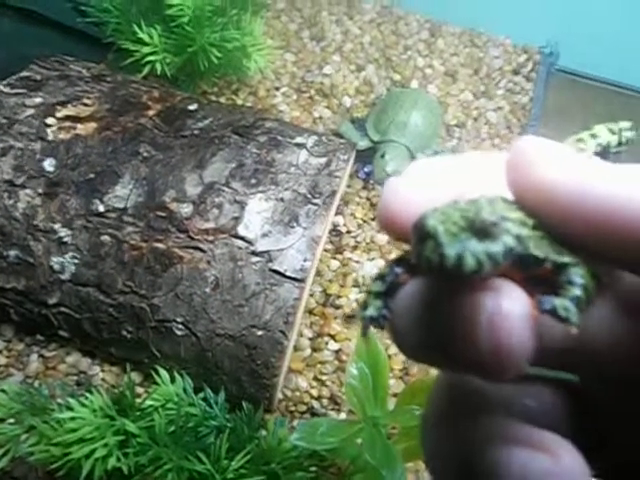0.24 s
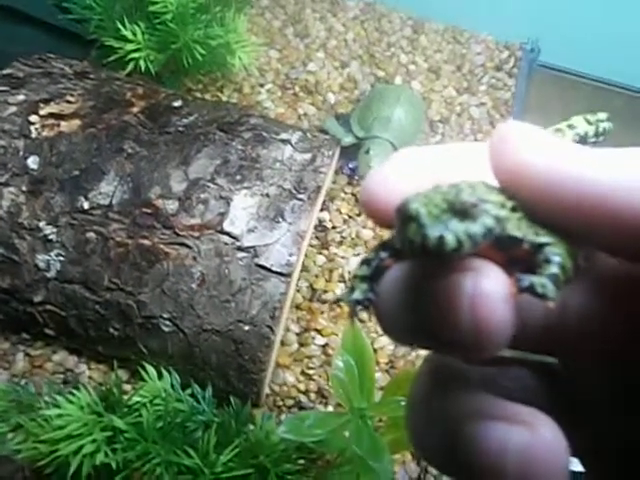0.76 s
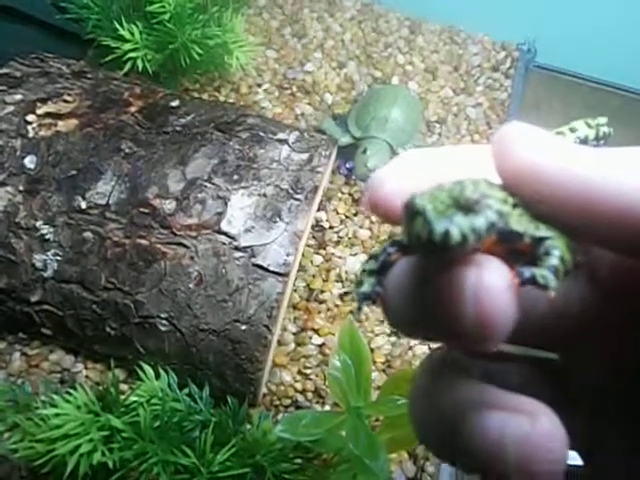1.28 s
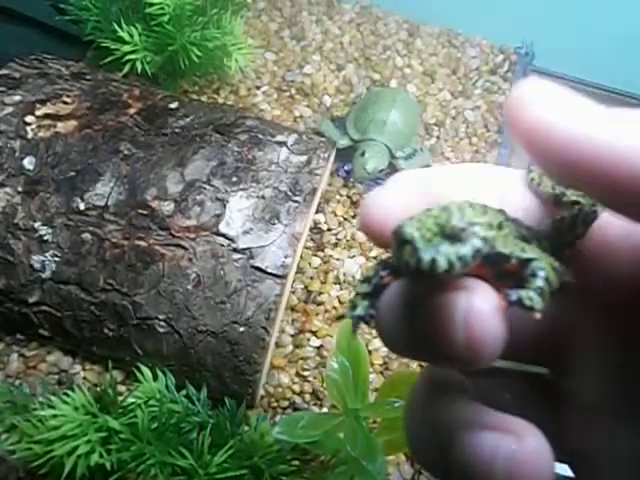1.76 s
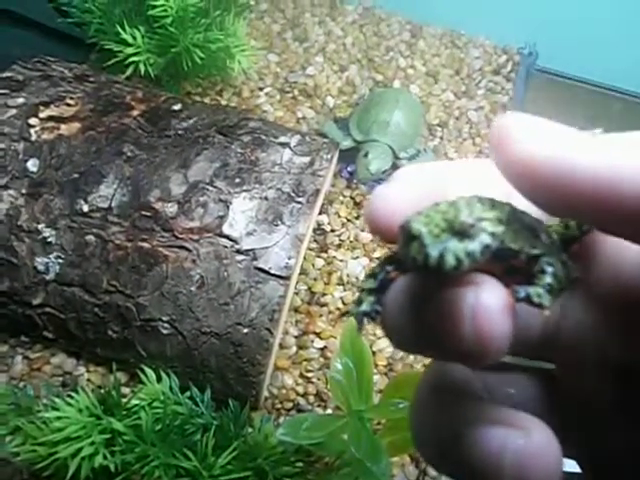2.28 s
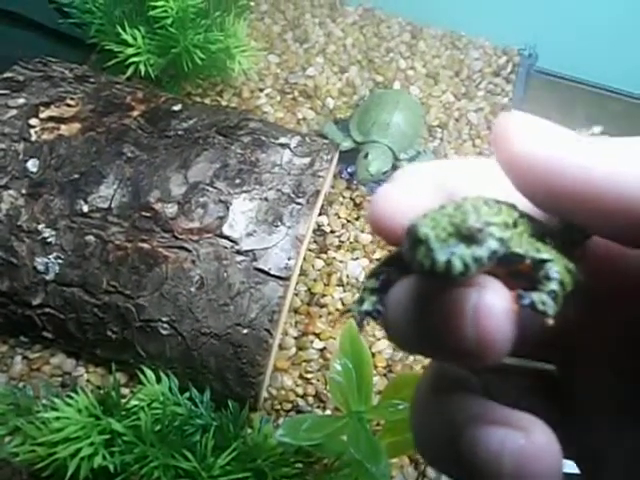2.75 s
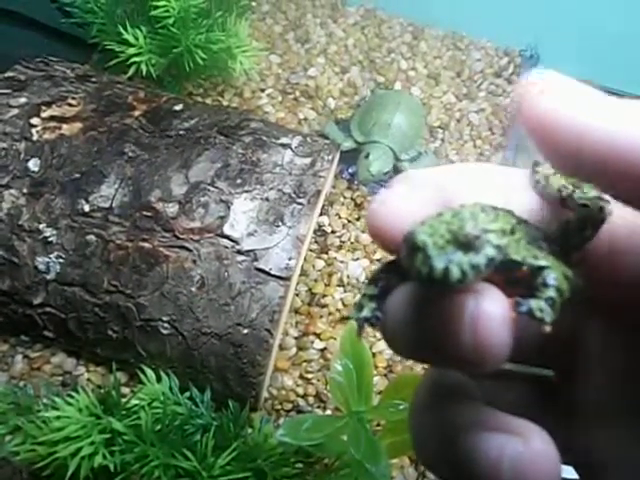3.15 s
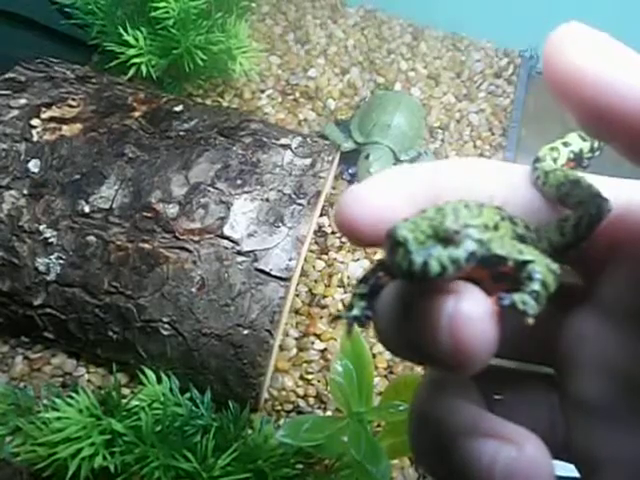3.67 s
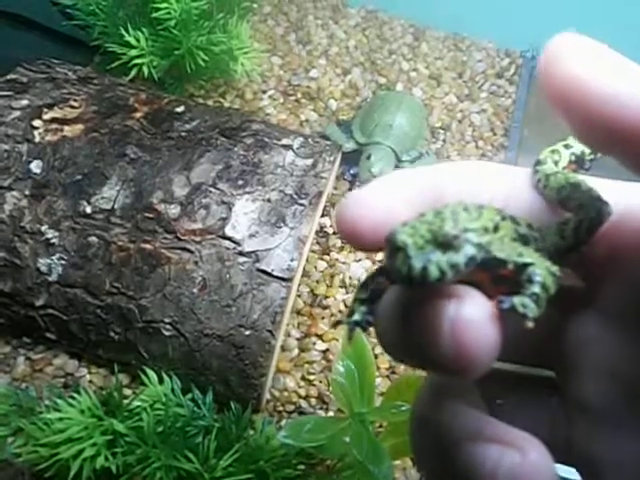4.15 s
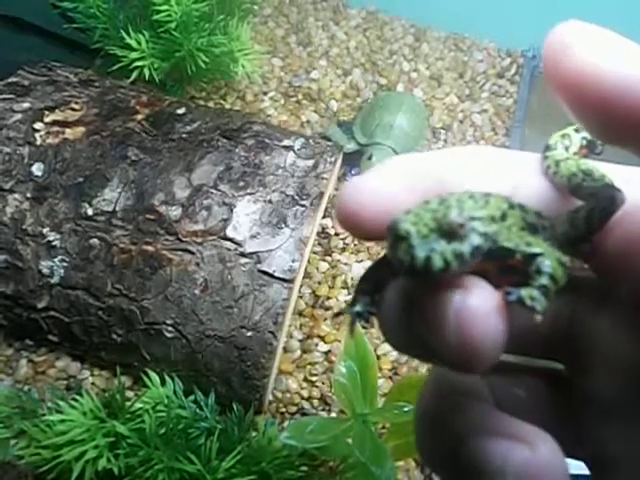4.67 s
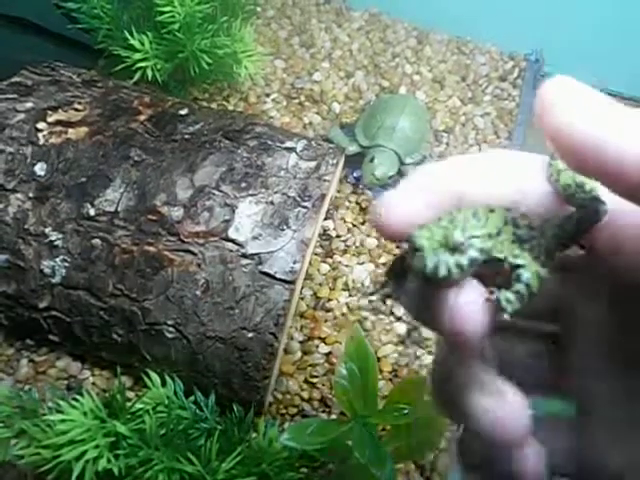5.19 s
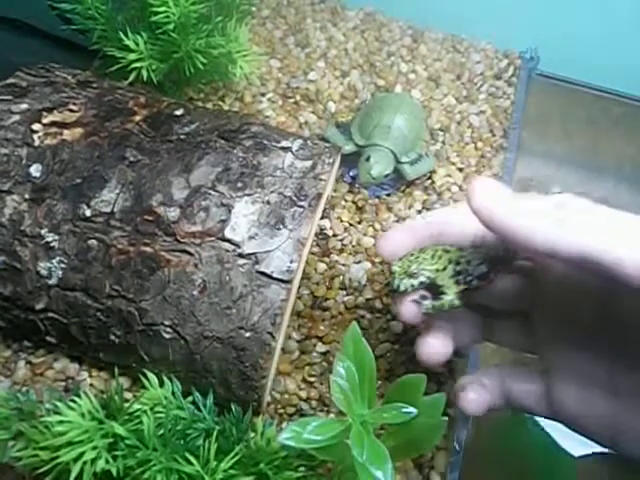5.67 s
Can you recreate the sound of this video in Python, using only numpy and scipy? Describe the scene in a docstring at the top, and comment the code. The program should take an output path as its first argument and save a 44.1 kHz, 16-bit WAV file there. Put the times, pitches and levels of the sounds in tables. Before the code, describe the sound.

A steady low hum near 120 Hz, with a soft rumble, runs throughout from a tank pump, under a quiet, slightly throbbing rush of water with fine crackle and irregular small ticks. Faint finger scuffs and a brief soft low tone come in the first 0.7 seconds. From about 0.35 to 1.1 seconds a small toad close by gives ten rapid chirps, each a tiny round whistle of some 30 milliseconds around 1.1 kHz, rising quickly then sagging, with a short hollow ring. Hum, water and ticks alone follow, with a barely audible wavering low tone near 2.1 to 2.6. A second run of twelve chirps lasts from 2.6 to 3.5, starting a little softer. After another pause, nine more come from 4.5 to 5.2, then one weaker chirp at 5.4. Hum and water continue to about 6 seconds. Small indoor space, very short echo, almost mono, dull highs.

```python
"""Toad chirping over a glass tank

A small toad held over a glass tank chirps in three runs: each chirp is a short tone that rises and sags, carried
by its second harmonic, and leaves narrow air resonances ringing. A mains-driven pump hums over a low rumble, water
rushes, crackles and ticks, soft low tones swell and fade, and fingers scuff as sums of sines and coloured noise.
A single microphone feeds both channels, the left a little late."""
import sys
import numpy as np
from scipy import signal
from scipy.fft import rfft, irfft, next_fast_len
from scipy.io import wavfile
from scipy.ndimage import map_coordinates

SR = 44100
rng = np.random.default_rng(int(sys.argv[2]) if len(sys.argv) > 2 else 0)


def store_pcm(level_fs):
    """Save levels as 16-bit WAV."""
    pcm = np.round(np.clip(level_fs, -1, 1) * 32767).astype(np.int16)
    wavfile.write(sys.argv[1], SR, np.atleast_2d(pcm).T)


N = 261492  # length in samples
MAINS_HZ = 60.02


def amp(db):
    """Decibel law: level in dB to amplitude gain."""
    return 10 ** (np.asarray(db) / 20)


def unit(x):
    """Power normalisation: x scaled to rms 1."""
    return x / np.sqrt(np.mean(x ** 2) + 1e-20)


def along(points, hz):
    """Logarithmic frequency scale: (Hz, value) points joined by straight lines on it."""
    f, value = np.transpose(points)
    return np.interp(np.log(hz + 1), np.log(f + 1), value)


def wobble(rate):
    """Band-limited fluctuation: a smooth random curve through rate knots a second."""
    knots = rng.standard_normal(int(N * rate / SR) + 4)
    return map_coordinates(knots, [np.arange(N) * rate / SR])


def filtered(x, response):
    """Linear filtering: the spectrum of x times a complex response of frequency."""
    size = next_fast_len(N + SR // 2)
    spectrum = rfft(x, size) * response(np.fft.rfftfreq(size, 1 / SR))
    return irfft(spectrum, size)[..., :N]


def resonances(modes, f):
    """Damped oscillators: summed causal response of (centre Hz, width Hz, peak dB) modes."""
    return sum(amp(db) * 1j * f * width / (centre ** 2 - f * f + 1j * f * width)
               for centre, width, db in modes)


def noise(spectrum):
    """Spectral shaping: white noise given a colour of (Hz, relative dB per Hz), at rms 1."""
    return unit(filtered(rng.standard_normal(N), lambda hz: amp(along(spectrum, hz))))


def toad():
    """Source and filter: a gliding harmonic tone excites air resonances, which beat against it as it sags."""
    # Each row: start in seconds, top pitch of the fundamental in Hz, nominal length in ms,
    # level in dB before the resonances, offset of the upper harmonics in dB
    chirps = [(0.343, 558, 24, -29.5, -47.5), (0.402, 569.4, 28.5, -26.5, -47),
              (0.475, 580, 31.6, -27, -47), (0.55, 545, 23, -26, -50), (0.636, 592, 33, -26.5, -47.5),
              (0.717, 543, 25, -26.5, -50), (0.799, 571, 31.6, -27, -49.5),
              (0.893, 597.6, 30, -26.5, -47.5), (0.973, 570, 29, -26, -49), (1.056, 564, 27, -26.5, -50.5),
              (2.579, 592, 33, -28.5, -44.5), (2.631, 588.5, 29, -28.5, -43), (2.699, 570, 26.7, -27, -46),
              (2.769, 585, 30, -26, -46), (2.854, 589.6, 29.6, -25, -47), (2.931, 581, 29, -26, -47.5),
              (3.027, 563.6, 27.6, -25.5, -48), (3.122, 564, 25.3, -25, -47.5),
              (3.207, 576, 29.3, -25.5, -47.5), (3.306, 555, 25, -26, -48.5), (3.396, 590, 30, -26, -46),
              (3.484, 575, 28.7, -26, -48), (4.481, 592.5, 32.5, -27.5, -45.5), (4.54, 566, 26, -27.5, -46),
              (4.611, 574, 30, -26, -47), (4.686, 573, 30, -26, -47.5), (4.773, 567, 28.5, -25, -49.5),
              (4.868, 565.5, 23.7, -24.5, -46.5), (4.96, 565, 25.7, -25, -49),
              (5.041, 537, 23.7, -26, -49.5), (5.144, 557, 25, -26.5, -49.5), (5.395, 580, 28, -30, -47)]
    # Harmonics whose level varies from chirp to chirp. Each row: multiple of the fundamental, level in dB
    # before the chirp's own offset
    upper_harmonics = [(3, 2), (4, -11.5), (5, -28.5)]
    # Air resonances near the toad. Each row: centre in Hz, width in Hz, peak level in dB
    air_modes = [(1149.6, 25, 0), (1007, 31, -9.5)]
    low_hz = 492.2
    # Pitch: starting shortfall (share of the span above low_hz), then top time and sag time (shares of length)
    start_below, top_at, sag_over, sag_sharp = 0.56, 0.29, 0.43, 2.32
    # Loudness: rise time in s, then onset (share of length) and depth in dB of the fade and the final dying
    attack_s, fade_from, fade_db, cut_from, cut_db = 0.002, 0.53, 7.5, 0.84, 25.5
    tail = 1.3  # each tone ends at this share of its nominal length

    voice = np.zeros(N + SR)
    air = noise([(1200, -37), (2200, -1.0), (4000, -6.0), (6000, -22.0)])
    for start, top_hz, ms, db, upper_db in chirps:
        u = np.arange(int(tail * ms * SR / 1000)) / (ms * SR / 1000)  # time in chirp lengths
        first = round(start * SR)

        rise = 1 - start_below * np.clip(1 - u / top_at, 0, 1) ** 2
        sag = np.exp(-(np.clip(u - top_at, 0, 1) / sag_over) ** sag_sharp)
        flutter = 1 + 0.0047 * np.interp(u, np.linspace(0, tail, 9), rng.standard_normal(9))
        pitch_hz = (low_hz + (top_hz - low_hz) * rise * sag) * flutter
        phase = 2 * np.pi * np.cumsum(pitch_hz) / SR

        fade = fade_db * np.clip((u - fade_from) / (1 - fade_from), 0, 1) ** 2
        cut = cut_db * np.clip((u - cut_from) / (tail - cut_from), 0, 1)
        swell = amp(-fade - cut) * (1 - np.exp(-u * ms / 1000 / attack_s))

        upper = sum(amp(level + upper_db + 2.3 * u) * np.sin(k * phase) for k, level in upper_harmonics)
        rasp = air[first:][:len(u)]  # escaping air roughens the upper voice
        tone = np.sin(2 * phase) + amp(-20.5 - 9.9 * u) * np.sin(phase) + amp(-34.5) * rasp
        chirp = amp(db) * tone + upper * (1 + 0.091 * rasp)
        voice[first:][:len(u)] += np.sqrt(2) * swell * chirp
    return filtered(voice[:N], lambda f: 1 + resonances(air_modes, f))


def echo(x):
    """Diffuse reverberation: the glass walls answer with a tail falling 60 dB in 0.09 s."""
    t = np.arange(SR // 5) / SR
    tail = rng.standard_normal(len(t)) * amp(-60 * t / 0.09)
    return signal.fftconvolve(x, tail / np.linalg.norm(tail))[:N]


def pump():
    """Mains-locked vibration: harmonics, the second far ahead, over an unsteady noise rumble."""
    # Each row: multiple of the mains frequency, level in dB at the start
    hum_harmonics = [(2, -25.5), (4, -59), (5, -61.5), (6, -61.5), (7, -64.5), (8, -65), (9, -65.5),
                     (10, -64), (11, -62), (13, -69), (19, -66.5)]
    # Colour of the rumble. Each row: frequency in Hz, relative level in dB per Hz
    rumble_colour = [(10, -16), (25, -17.5), (41, -5.5), (55, -15.5), (68, -6), (82, -12), (105, -4.5),
                     (135, -3), (180, -6.5), (195, -22), (260, -58)]
    hum_fade_db_per_s = 0.15

    t = np.arange(N) / SR
    phase = 2 * np.pi * MAINS_HZ * t
    tones = sum(amp(db + 0.081 * wobble(4.6)) * np.sin(k * phase + rng.uniform(0, 2 * np.pi))
                for k, db in hum_harmonics)
    hum = np.sqrt(2) * amp(-hum_fade_db_per_s * t) * tones
    rumble = amp(-40.5 + 0.5 * wobble(3.3)) * noise(rumble_colour)
    return hum + rumble


def water():
    """Modulated flow noise: a patchy rush throbs with the pump stroke, beside a fine crackle and ticks."""
    # Colour of the rush before the tank. Each row: frequency in Hz, relative level in dB per Hz
    rush_colour = [(130, -43.5), (200, -9), (240, -13.5), (340, -4.5), (390, -13.5), (420, -13.5),
                   (920, -12), (1070, -20), (1370, -22.5), (2000, -23), (2700, -27), (4150, -27.5),
                   (4500, -32), (6200, -30), (7440, -28.5), (9000, -70)]
    # Tank resonances in the rush. Each row: centre in Hz, width in Hz, peak level in dB
    tank_modes = [(877, 28, -2.5), (1217, 59, 12), (1465, 30, 11.5), (1620, 12, 3.5), (1894, 12, 2),
                  (1877, 7.6, 5), (3360, 140, 3)]
    rush_db, crackle_start_db, crackle_db_per_s = -48.5, -64.5, 0.5

    t = np.arange(N) / SR
    throb_db = 1.6 * np.sin(np.pi * MAINS_HZ * t) ** 6  # one peak each mains cycle
    stroke = amp(throb_db + 0.82 * wobble(9) + 1.1 * wobble(30))
    # the resonances add to the rush in power
    rush = filtered(noise(rush_colour), lambda f: np.sqrt(1 + np.abs(resonances(tank_modes, f)) ** 2))

    draw = rng.random(size=(900, 4))
    hz = 2900 + 3800 * draw[:, 1] ** 3.5
    size_db = -3 * np.log(draw[:, 2] + 0.02) - 9 * np.log2(hz / 3300)  # few large, higher ones weaker
    width_hz = 400 + 1200 * draw[:, 3] ** 2
    crackle = unit(ticks(draw[:, 0] * N / SR, size_db, hz, width_hz, 3 + 3 * draw[:, 3]))
    crackle_db = crackle_start_db + crackle_db_per_s * t
    return amp(rush_db) * stroke * unit(rush) + amp(crackle_db) * crackle + drips()


def drips():
    """Impulsive excitation: clear ticks at set moments, faint ones scattered at random."""
    # Each row: start in seconds, peak level in dB, centre in Hz, time to fall 10 dB in ms
    clear_ticks = [(0.034, -43, 6800, 11), (0.251, -46, 2900, 28), (0.312, -36.5, 3300, 5.5),
                   (0.405, -52, 4650, 13), (0.446, -40, 2760, 16), (0.601, -45, 6370, 6),
                   (0.633, -41, 2880, 10), (0.956, -38, 3600, 6), (1.107, -43, 3450, 11),
                   (1.12, -47, 5200, 9), (1.296, -44.5, 6030, 6), (1.757, -43.5, 3800, 11),
                   (2.166, -39.5, 5920, 4.5), (2.357, -44.5, 3450, 7), (2.474, -46, 4270, 12),
                   (2.59, -43, 3790, 8), (2.711, -43.5, 6170, 8), (2.757, -40, 4900, 1.5),
                   (3.04, -43.5, 3380, 11), (3.091, -45, 4100, 3), (3.329, -42.5, 3700, 25),
                   (3.503, -37.5, 5980, 5.5), (3.848, -38, 3900, 8), (4.098, -45, 6200, 10),
                   (4.155, -46, 3960, 8), (4.218, -40.5, 4650, 11), (4.267, -47, 6370, 8),
                   (4.341, -44, 3900, 6), (4.49, -45.5, 3800, 10), (4.514, -35, 5800, 16),
                   (4.68, -43, 6030, 9), (4.712, -43, 3450, 2), (5.059, -41.5, 3730, 19),
                   (5.322, -46.5, 3520, 13), (5.406, -42.5, 3730, 7)]
    width_hz = 380  # of the clear ticks; the faint ones are up to twice as wide
    faint_db, faint_low_hz, faint_high_hz, faint_ms = -50.5, 4300, 6600, 8.7

    start, db, hz, ms = np.transpose(clear_ticks)
    clear = ticks(start, db, hz, np.full(len(start), width_hz), ms)
    draw = rng.random(size=(22, 4))
    faint = ticks(draw[:, 0] * N / SR, faint_db + 5 * (draw[:, 1] - 0.5),
                  faint_low_hz + (faint_high_hz - faint_low_hz) * draw[:, 2],
                  width_hz * (1 + draw[:, 3]), np.full(len(draw), faint_ms))
    return clear + faint


def ticks(times, db, hz, width_hz, ms):
    """Resonant bursts: puffs of noise, falling 10 dB in ms, each pass a resonant band plus a weak, sharper copy
    of it."""
    t, f = np.arange(2048) / SR, np.fft.rfftfreq(2048, 1 / SR)
    decay = amp(-10 * t * 1000 / ms[:, None])
    puff = rng.standard_normal((len(times), len(t))) * decay * (1 - np.exp(-t / 0.0016))
    damping = 1j * f * width_hz[:, None]
    band = damping / (hz[:, None] ** 2 - f * f + damping)
    band = band * (1.3 + 0.22 * band)
    band = band * f * f / (f * f + 2000 ** 2)  # thins out the lows
    wave = irfft(rfft(puff) * band)
    wave = wave / np.abs(wave).max(axis=1, keepdims=True) * amp(db[:, None])
    at = (times[:, None] * SR).astype(int) + np.arange(len(t))
    return np.bincount(at.ravel(), wave.ravel(), N + SR)[:N]


def fingers():
    """Friction noise: shifting fingers scuff in grainy bursts with bell-shaped loudness."""
    # Each row: middle in seconds, time from the middle to fall 10 dB in seconds, level at the middle in dB
    scuffs = [(.26, .07, -60), (.44, 0.081, -53.5), (.6, 0.067, -67.5)]
    # Colour of the scuffs. Each row: frequency in Hz, relative level in dB per Hz
    skin_colour = [(1500, -22), (2800, -5.5), (4600, -11), (6200, -7.5), (7500, -17)]
    t = np.arange(N) / SR
    strokes = sum(amp(db - 10 * ((t - middle) / half) ** 2) for middle, half, db in scuffs)
    grain = amp(4.5 * wobble(60))
    return strokes * grain * noise(skin_colour)


def soft_tones():
    """Frequency and amplitude modulation: faint wavering sines swell and fade over half-sine arches."""
    # Each row: start in seconds, length in seconds, mean pitch in Hz, peak amplitude in dB before wavering
    low_tones = [(.09, 0.063, 790, -41), (0.373, 0.061, 563, -46), (2.14, 0.43, 532, -51.5)]
    t = np.arange(N) / SR
    total = np.zeros(N)
    for start, length, hz, db in low_tones:
        arch = np.sin(np.pi * np.clip((t - start) / length, 0, 1))
        phase = 2 * np.pi * np.cumsum(hz * (1 + 0.017 * wobble(12))) / SR
        total += amp(db + 0.86 * wobble(9.7)) * arch * np.sin(phase)
    return total


def scene():
    """Superposition and phase delay: all sources sum to one signal, and the left channel lags the right."""
    left_lag_s = 2.75 / 44100
    call = toad()
    mono = call + amp(-15.0) * echo(call) + pump() + water() + soft_tones() + fingers()
    sides = np.array([[1], [-1]])  # left half the lag late, right half the lag early
    return filtered(mono, lambda f: np.exp(-1j * np.pi * f * left_lag_s * sides))


def record(dry):
    """Band limiting: a very steep zero-phase low-pass removes the top of the spectrum."""
    top_hz = 7590
    return filtered(dry, lambda hz: 1 / (1 + (hz / top_hz) ** 100))


dry = scene()
out = record(dry)
store_pcm(out)
```